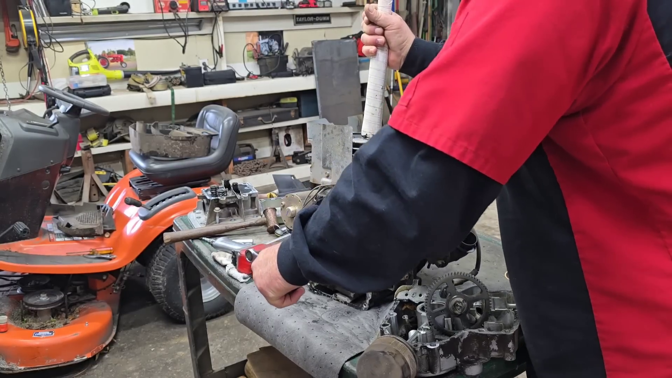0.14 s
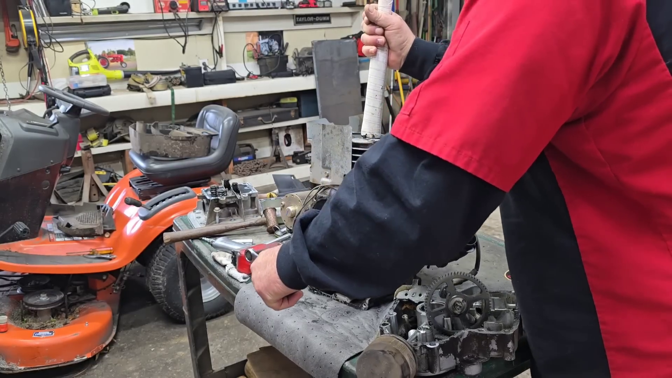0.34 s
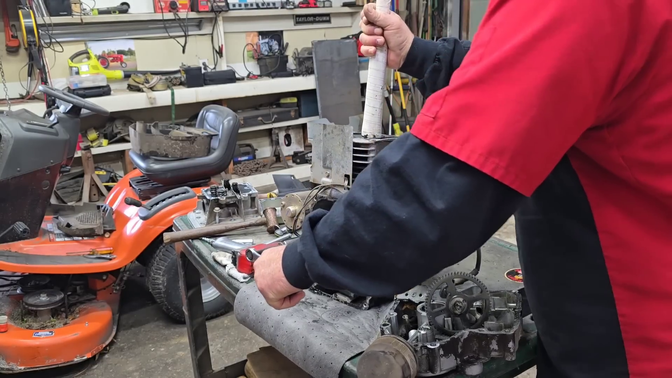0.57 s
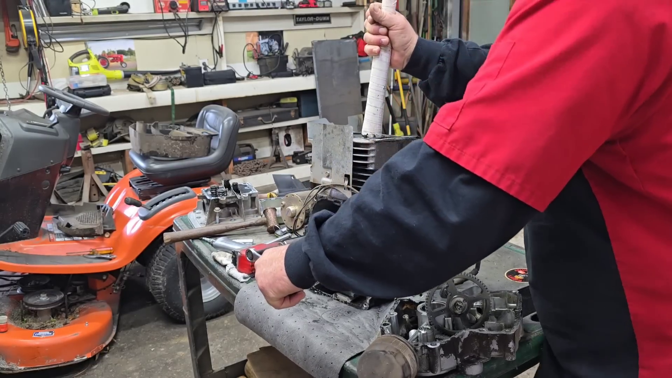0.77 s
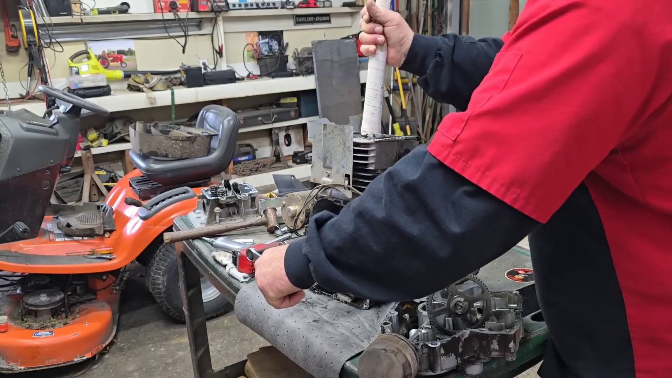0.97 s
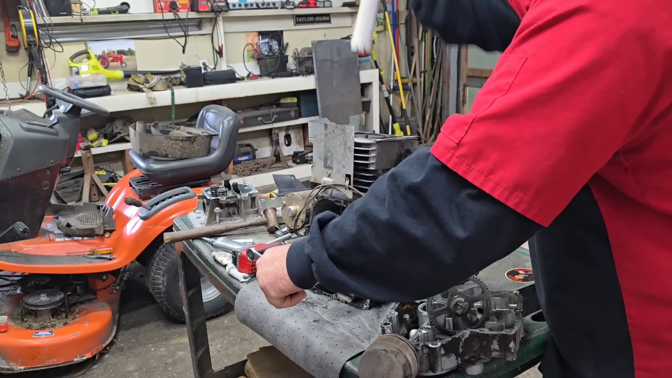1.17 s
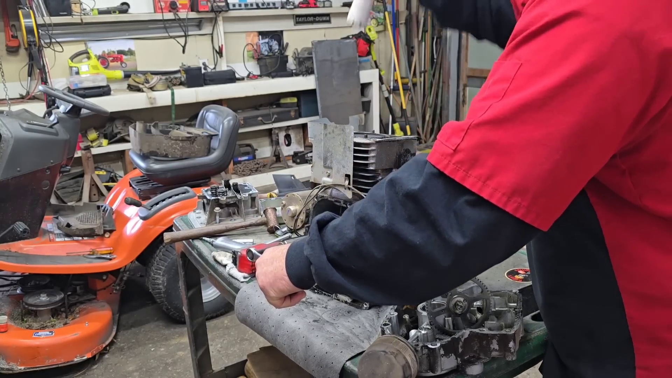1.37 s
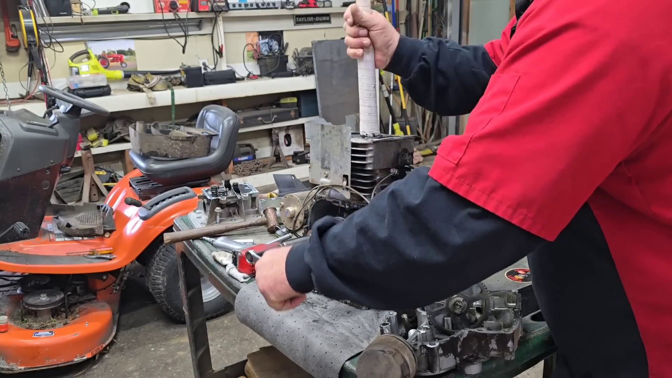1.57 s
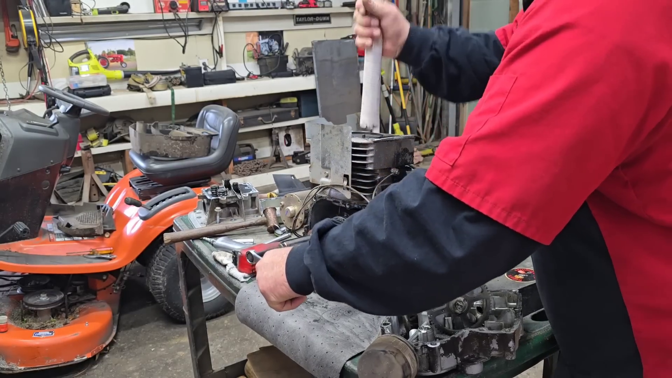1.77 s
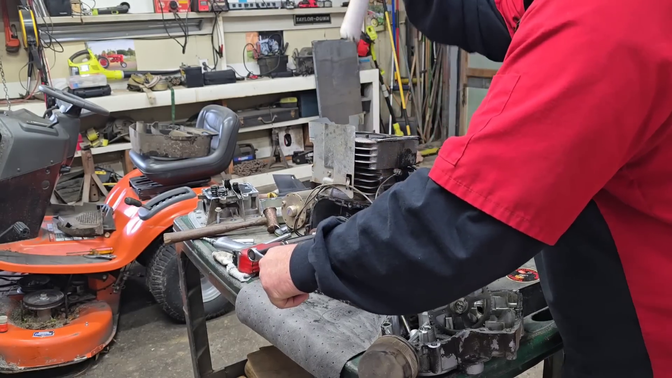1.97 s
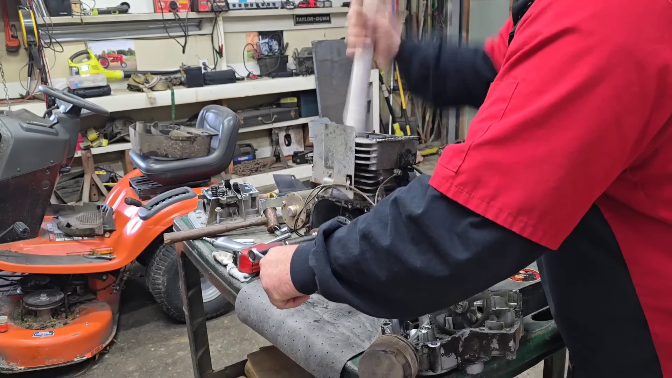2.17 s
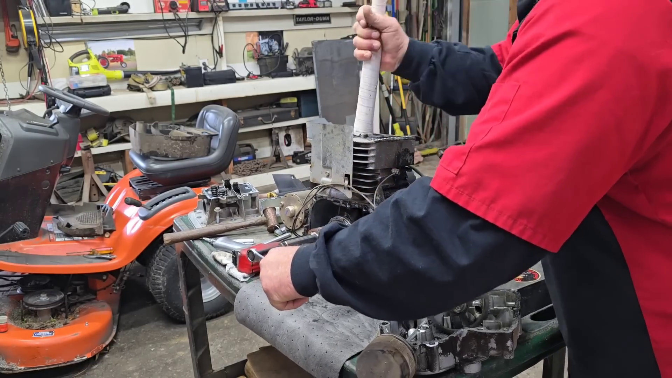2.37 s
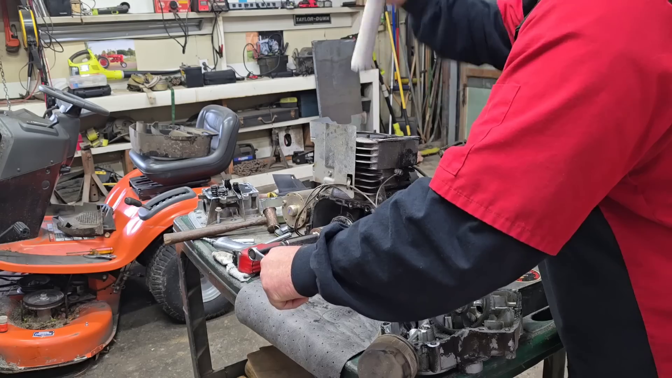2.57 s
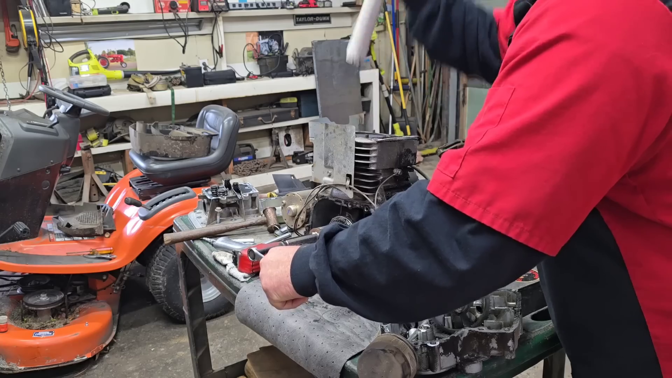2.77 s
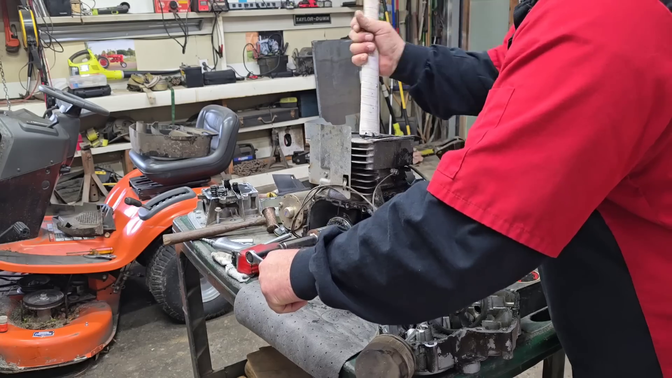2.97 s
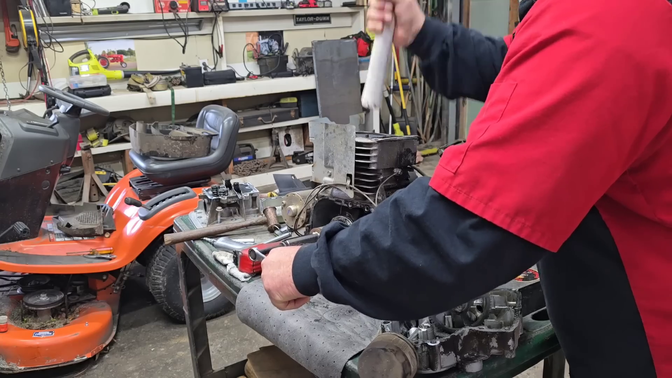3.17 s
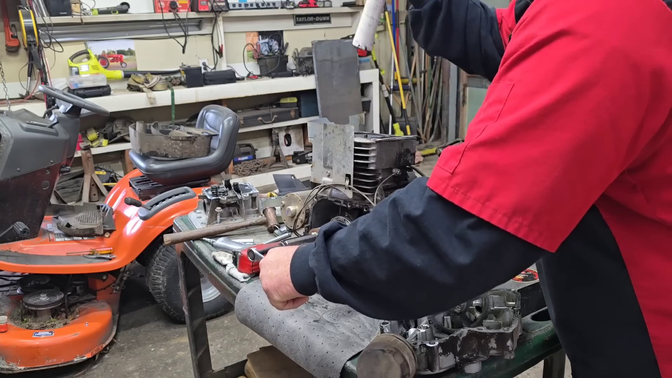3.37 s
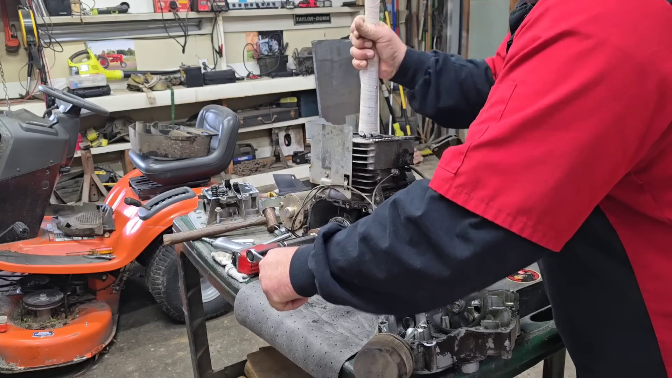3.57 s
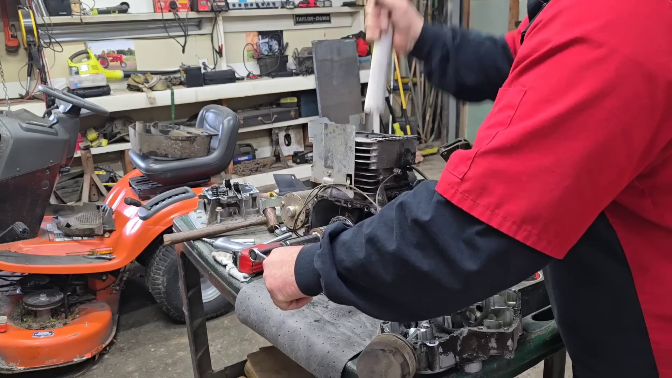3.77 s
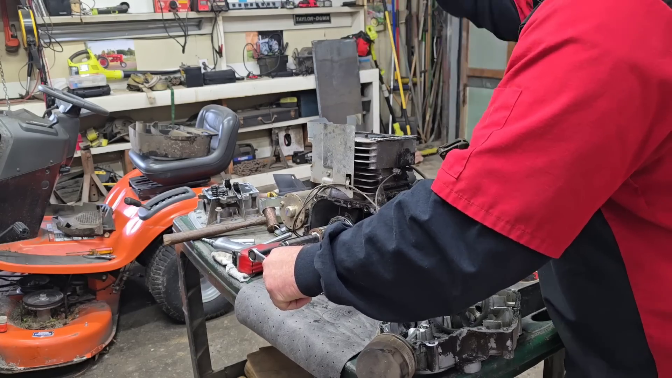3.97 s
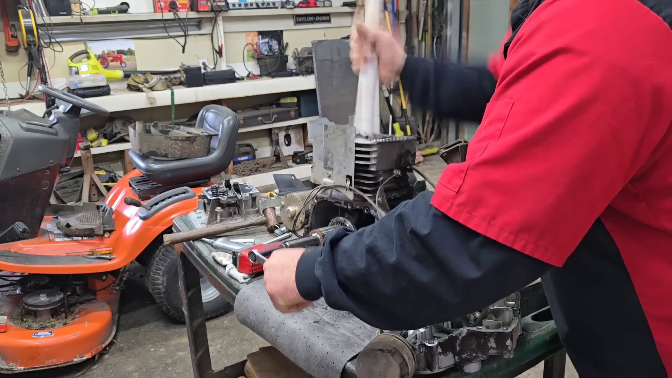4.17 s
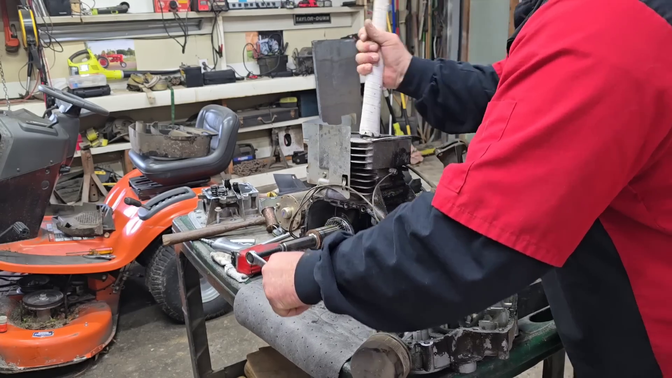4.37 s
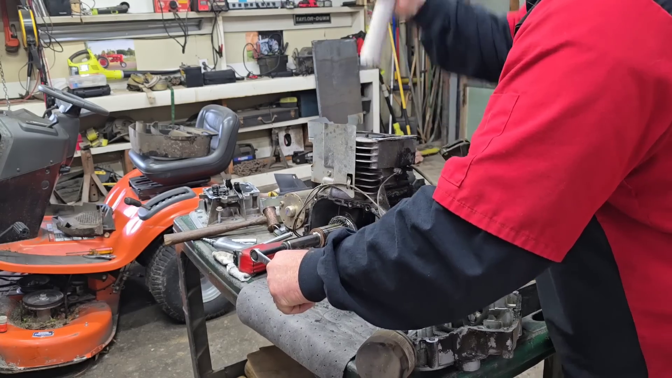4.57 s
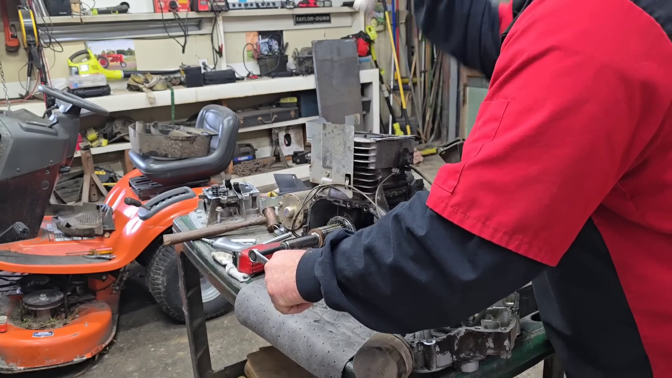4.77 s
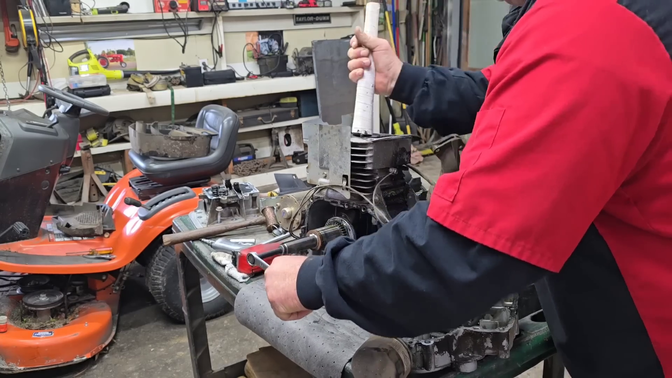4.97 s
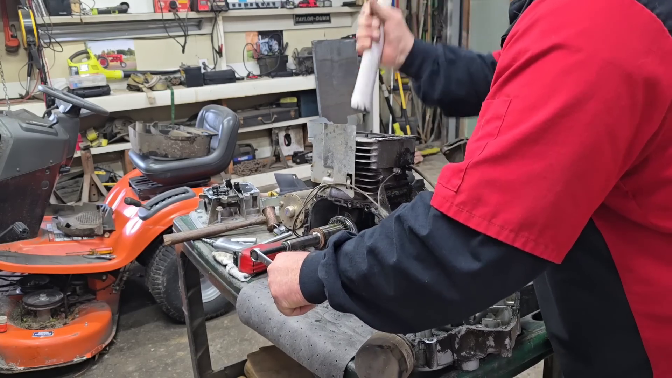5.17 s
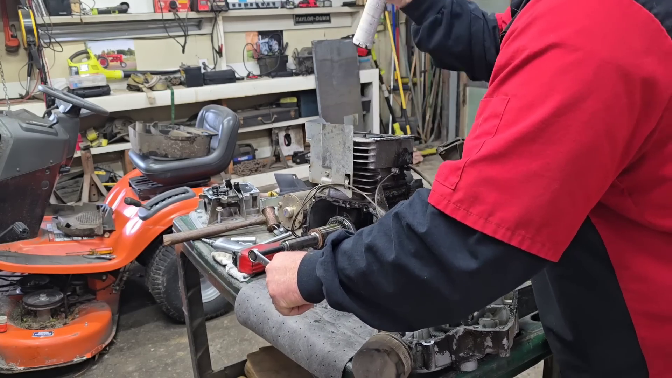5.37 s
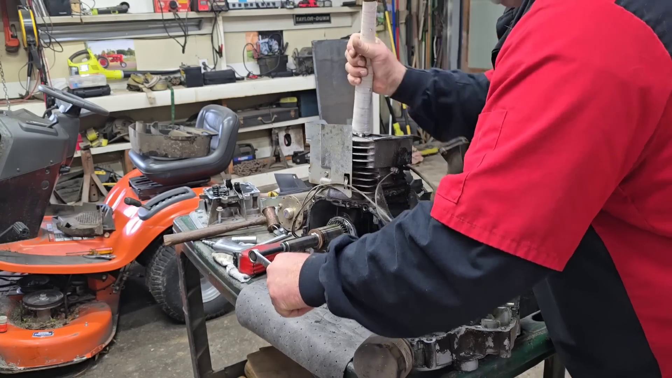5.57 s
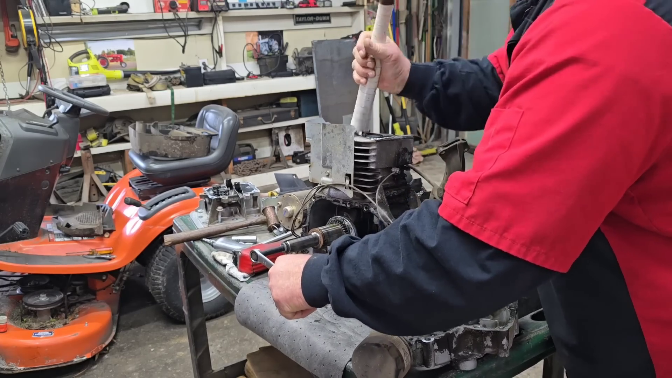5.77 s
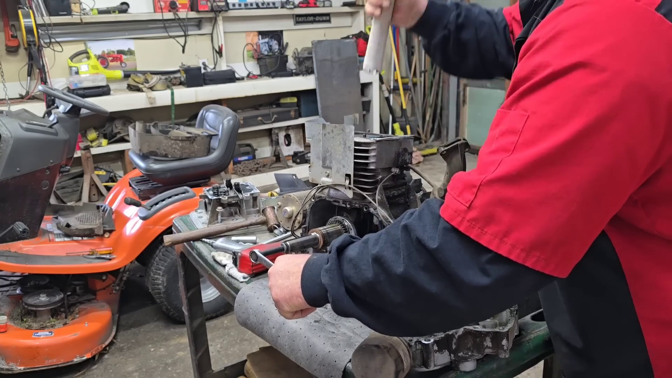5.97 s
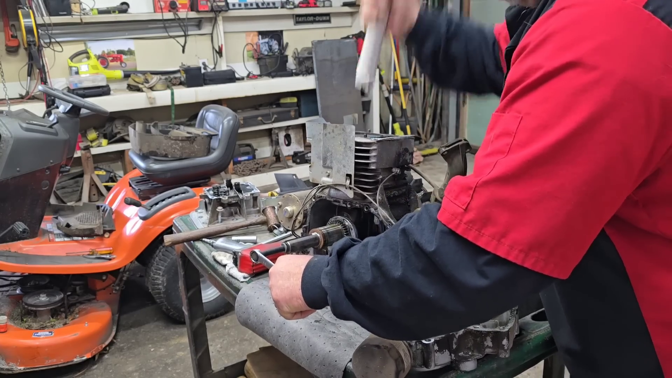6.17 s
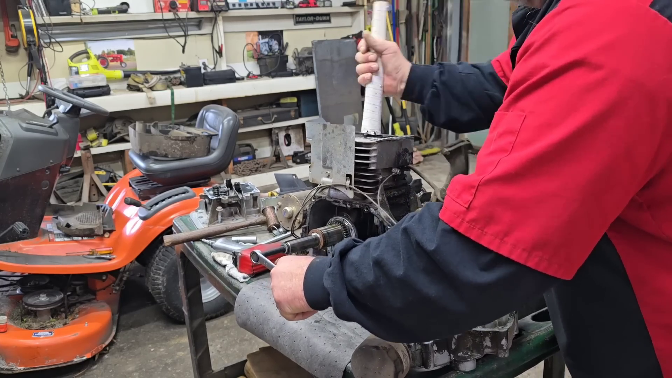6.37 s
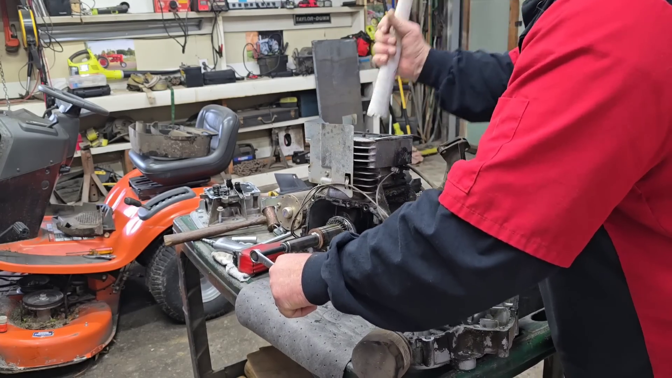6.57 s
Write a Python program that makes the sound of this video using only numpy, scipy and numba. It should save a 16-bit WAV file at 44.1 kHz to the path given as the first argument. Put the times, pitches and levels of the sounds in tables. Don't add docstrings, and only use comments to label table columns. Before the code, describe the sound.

Quiet cloth rustle and a faint tool scrape open in a workshop. From about one and a half seconds, eight sharp wood-on-metal blows land at even spacing, each a loud crack with woody ring, metallic fin ring and low bench boom. Soft thuds and loose spanner clinks fall between them. Close phone microphone, limited peaks, tails cut short by noise suppression.

```python
import sys
import numpy as np
from scipy import signal
from scipy.fft import rfft, irfft
from scipy.io import wavfile
from scipy.ndimage import uniform_filter1d, minimum_filter1d
from numba import njit

SR = 44100
rng = np.random.default_rng(int(sys.argv[2]) if len(sys.argv) > 2 else 0)


def generate_wav(sig):
    pcm = np.round(np.clip(np.atleast_2d(sig).T, -1, 1) * 32767).astype(np.int16)
    wavfile.write(sys.argv[1], SR, pcm)


def attenuation_scalar(level_db):
    decades = np.asarray(level_db, float) / 20
    return 10 ** decades


N = 292383

# t/s, strength/dB, handle level/dB, fins level/dB, brightness/(dB per octave)
BLOWS = [
    (1.525, 6, 4.5, -6.5, -1.5),
    (2.209, 8, -4, -1.5, -0.5),
    (2.866, 7.5, -5, -4, 1),
    (3.515, 6.5, 0, -1, -0.5),
    (4.1921, 13, -1.5, 1, 1),
    (4.8879, 11.5, -12.5, 4.5, -2.5),
    (5.5588, 3, 0.5, -23, 0),
    (6.239, 7.5, -7, 9, 4),
]
BLOW_SIZE = 2 * SR // 3


def on_log(table, hz):
    table = np.array(table)
    return np.interp(np.log(hz + 1), np.log(table[:, 0]), table[:, 1])


def colour(x, table):
    log_gain = on_log(table, np.fft.rfftfreq(4096, 1 / SR)) * np.log(10) / 20
    ceps = irfft(log_gain)
    ceps[1:2048] *= 2
    ceps[2049:] = 0
    return signal.fftconvolve(x, irfft(np.exp(rfft(ceps))))[:len(x)]


def fall(t60, size):
    return np.exp(-np.log(1000) * np.arange(size) / SR / t60)


def swish(s, rise_t60, fall_t60):
    t = np.arange(N) / SR - s
    return attenuation_scalar(-120 * np.where(t < 0, -t / max(rise_t60, .02), t / max(fall_t60, .02)))


def ring(modes, scatter_db, size, rough=0.11):
    t = np.arange(size) / SR
    out = np.zeros(size)
    for hz, db, t60 in modes:
        draw = rng.standard_normal(64)
        level = attenuation_scalar(db + scatter_db * draw[0])
        tone = np.sin(2 * np.pi * hz * (1 + .004 * draw[1]) * t)
        waver = 1 + rough * np.interp(t * 70, np.arange(62), draw[2:])
        out += level * tone * fall(t60, size) * waver
    return out


def add(out, s, x):
    i = int(s * SR)
    out[i:i + len(x)] += x[:N - i]


def shop(x, wet_db):
    # f/Hz, t60/s
    shop_t60 = [(60, .33), (250, 0.23), (1000, 0.33), (4000, 0.35), (7000, 0.29), (11000, 0.24),
                (16000, 0.17)]
    size = SR
    hz = np.fft.rfftfreq(size, 1 / SR)
    noise = rfft(rng.standard_normal(size))
    echo = np.zeros(size)
    for centre in 45 * 2 ** np.arange(0, 9, .5):
        band = np.clip(1 - 2 * np.abs(np.log2((hz + 1) / centre)), 0, 1)
        echo += irfft(noise * band, size) * fall(on_log(shop_t60, centre), size)
    echo *= np.minimum(np.arange(size) / SR / 0.0083, 1)
    echo /= np.sqrt(np.sum(echo ** 2))
    return x + attenuation_scalar(wet_db) * signal.fftconvolve(x, echo)[:N]


def air():
    # f/Hz, level/(dB per Hz)
    rumble_tone = [(24, -72.5), (40, -16), (91, -7), (214, -3), (265, -3), (942, -24), (1200, -38),
                   (1560, -72.5), (2640, -120)]
    rustle_tone = [(290, -28), (500, 3), (960, 1), (1050, 1), (1360, -1.5), (2130, -6.5), (2360, -10),
                   (4150, -5.5), (4800, -4), (7640, -15.5), (16000, -58.5)]
    slide_tone = [(700, -27), (1200, -6.5), (1360, 3.5), (1550, -4.5), (2200, -7), (2620, 0), (2900, -11.5),
                  (5000, -18), (8000, -37.5)]
    # t/s, level/dB
    slide_db = [(0, -60), (.2, -63.5), (.24, -58.5), (.42, -54), (.5, -62), (.6, -100)]
    # t of peak/s, rumble level/dB, rustle level/dB, rise t60/s, fall t60/s
    moves = [(0, -67.5, -64, .3, 2.5), (.22, -56.5, -64.5, 0.55, 2.5), (.42, -58, -56, 1.5, 0.76),
             (.7, -56, -63.5, 1.7, 0.57), (0.837, -47.5, -50, 0.043, 0.48), (1.08, -64.5, -74.5, 1.5, 1.5),
             (1.251, -61.5, -65, 2.3, 1.3), (1.5, -51.5, -61.5, 0.35, .7), (1.829, -51, -53, 0.04, 0.11),
             (1.95, -53.5, -74, 1.5, 2.2), (2.149, -57.5, -50.5, 0.76, 0.19),
             (4.65, -61.5, -60.5, 1.2, 1.1), (4.82, -63, -62.5, 1.7, 4.5), (6.052, -67, -73.5, .3, .45),
             (6.2, -68, -68, .5, 0.82)]
    rumble, rustle = attenuation_scalar(2 * -74.5), attenuation_scalar(2 * -81)
    for s, rumble_db, rustle_db, rise_t60, fall_t60 in moves:
        shape = swish(s, rise_t60, fall_t60)
        rumble = rumble + attenuation_scalar(2 * rumble_db) * shape
        rustle = rustle + attenuation_scalar(2 * rustle_db) * shape
    after_s, rise_t60_s, share = 0.25, 0.9, 0.68
    for s, db, *_ in BLOWS:
        rumble = rumble + attenuation_scalar(2 * (-68 + share * db)) * swish(s + after_s, rise_t60_s, 2.5)
        rustle = rustle + attenuation_scalar(2 * (-70 + share * db)) * swish(s + after_s, rise_t60_s, 1.7)
    slide = attenuation_scalar(2 * np.interp(np.arange(N) / SR, *np.transpose(slide_db)))
    layers = [(rumble_tone, rumble, 40, 3.5), (rustle_tone, rustle, 25, 2.5), (slide_tone, slide, 30, 1.5)]
    out = np.zeros(N)
    for tone, power, rate_hz, patchy_db in layers:
        x = colour(rng.standard_normal(N), tone)
        k = int(SR / rate_hz)
        flicker = uniform_filter1d(np.repeat(rng.standard_normal(N // k + 1), k), k)[:N]
        out += x / np.std(x) * np.sqrt(power) * attenuation_scalar(patchy_db * flicker)
    return out


def pings():
    # t/s, level/dB, f/Hz, t60/s
    ping_events = [(1.55, -44, 12680, .3), (2.215, -44, 15700, .35), (2.306, -30, 7620, .25),
                   (2.33, -49, 6610, 1.1), (2.365, -57, 12650, .15), (2.184, -36, 2110, .15),
                   (4.62, -60, 4500, .4), (5.055, -9, 2350, .03), (6.3, -24, 1620, .45),
                   (3.0, -50, 6610, 1.0), (4.27, -52, 14850, .3), (4.92, -46, 12680, .35),
                   (5.06, -56, 10900, .5), (5.8, -53, 6610, .9), (5.566, -17, 5270, .2),
                   (2.225, -11, 5320, .22), (2.87, -14, 3990, .38), (3.53, -14, 4020, .25),
                   (6.245, -12, 4560, .4), (6.26, -46, 15700, .35)]
    out, size = np.zeros(N), SR // 2
    for s, db, hz, t60 in ping_events:
        modes = [(hz, db, t60), (hz * 1.012, db - 4, t60), (hz * .99, db - 6, t60)]
        add(out, s, ring(modes, 2, size, rough=.9) * (1 - fall(.1 * t60, size)))
    return out


def thuds():
    # t/s, peak level/dB, pitch f/Hz, scuff brightness/dB
    thud_events = [(0.197, -54, 220, -25), (0.229, -28.5, 530, 1), (0.258, -35, 214, -33),
                   (0.36, -33.5, 162, -34), (0.39, -34.5, 160, -29), (0.569, -17, 158.7, -19),
                   (0.828, -35, 473, -25), (0.903, -38.5, 214, -23), (1.858, -19.5, 152, -30.5),
                   (1.889, -36.5, 298, -19), (1.919, -36, 144, -29), (1.954, -25.5, 164, -21),
                   (2.499, -21, 163.2, -20.5), (2.552, -30, 126.5, -21), (2.601, -25.5, 146.5, -12),
                   (2.661, -38.5, 224, -24), (2.706, -40.5, 152.6, -26), (2.756, -53, 325.5, -24.5),
                   (3.125, -28.5, 163.4, -22.5), (4.417, -8.5, 174, -10.5), (4.462, -14.5, 152, -17.5),
                   (4.523, -22.5, 164, -21.5), (4.654, -37.5, 135, -17), (4.719, -21.5, 258, -37),
                   (5.162, -20, 158.4, -2), (5.301, -34.5, 131.4, -17), (5.807, -29.5, 161, -31.5),
                   (6.008, -44.5, 238, -11)]
    out, size = np.zeros(N), SR // 3
    for s, db, hz, bright_db in thud_events:
        t60 = 0.11 * (160 / hz) ** 0.25
        x = np.zeros(size)
        for share, mode_db in (1, 0), (.7, -4), (1.4, -5), (2.1, -11):
            x += ring([(share * hz, mode_db, t60)], 2, size)
        scuff = [(40, -24.5), (90, -3.5), (200, 10.0), (600, -3),
                 (1500, bright_db), (5000, bright_db - 13), (9000, -62)]
        x += attenuation_scalar(5) * colour(rng.standard_normal(size) * fall(t60, size), scuff)
        add(out, s, attenuation_scalar(db - 1) * x * (1 - fall(0.021, size)))
    return out


def clinks():
    # t/s, peak level/dB, ring level/dB, brightest f/Hz
    clink_events = [(.229, -38, -25, 2400), (2.0189, -16.5, -7, 3550), (2.0686, -22, -12.5, 4470),
                    (2.1012, -12.5, -4.5, 2995), (2.187, -31.5, -21, 2133), (2.594, -38.5, -8, 4450),
                    (2.763, -38, -25, 800), (3.936, -34.5, -25.5, 702), (4.6201, -41, -14, 5075),
                    (4.781, -34, -16, 1800), (4.975, -13, -21.5, 8920), (5.0567, 6, -22, 2336),
                    (5.08, -10, -20, 2465), (6.013, -28.5, -36, 1095)]
    # f/Hz, level/dB, t60/s
    spanner = [(960, -16, .05), (1280, -16, .05), (2080, -10, .14), (3070, -12, .07), (4610, -13, .09),
               (5080, -11, .07), (6010, -15, .07), (7930, -19, .04), (12630, -29, .12)]
    out, size = np.zeros(N), SR // 3
    for s, db, ring_db, hz in clink_events:
        tone = [(hz / 6, -30), (hz / 4.0, -7), (hz, 0), (hz * 1.2, -3),
                (hz * 2.5, -10), (hz * 4, -28), (40000, -60)]
        chatter = fall(0.0093, size) + attenuation_scalar(-5) * fall(.14, size)
        tick = colour(rng.standard_normal(size) * chatter, tone)
        tick = colour(tick, [(7000, 0), (10000, -7.5), (14000, -21)])
        add(out, s, attenuation_scalar(db) * (tick + attenuation_scalar(ring_db) * ring(spanner, 1.2, size, rough=1.0)))
    return out


def squash():
    return 1 - fall(0.021, BLOW_SIZE)


def crack(tilt):
    # f/Hz, level/(dB per Hz)
    crack_tone = [(40, -29), (120, -4), (230, 0.5), (500, -5.5), (700, 1), (1000, -8), (1650, -8),
                  (2000, -14.5), (2400, -13), (3200, -17.5), (5400, -12), (8000, -25), (11000, -34.5),
                  (16300, -49.5)]
    noise = rng.standard_normal(BLOW_SIZE)
    rebound = np.roll(fall(0.013, BLOW_SIZE), int(.017 * SR))
    spiky = noise ** 3 / np.sqrt(15)
    rattle = colour(spiky * fall(0.17, BLOW_SIZE), [(5000, -4), (12000, -14)])
    hit = noise * (fall(0.031, BLOW_SIZE) + attenuation_scalar(-5.5) * rebound)
    burst = squash() * (hit + attenuation_scalar(-14.0) * rattle)
    brightness = [(150, -2.5), (600, -1.0), (1000, -2.5), (16000, 4 * tilt)]
    return attenuation_scalar(17.5) * colour(colour(burst, crack_tone), brightness)


def bench_boom(tilt):
    # f/Hz, level/dB, t60/s
    bench = [(85, -6, .25), (132.33, 1.6, 0.36), (173, -2, 0.51), (223.8, 6.5, 0.25), (286, -3.5, 0.34),
             (316.3, -9, 0.41), (381, -12, 0.45), (435, -17.5, 0.53), (529, -14, 0.08)]
    boom_tone = [(60, -10.5), (130, -3.0), (300, 5.5), (550, -5), (1200, -41.0), (9000, -81)]
    boom = colour(rng.standard_normal(BLOW_SIZE), boom_tone) * fall(0.28, BLOW_SIZE)
    swell = (1 - fall(0.12, BLOW_SIZE)) ** 2
    modes = ring(bench, 1.5, BLOW_SIZE, rough=.1)
    return attenuation_scalar(-1.87 - 0.87 * tilt) * swell * (attenuation_scalar(-7.5) * modes + attenuation_scalar(17.5) * boom)


def handle_and_fins(handle_db, fins_db):
    # f/Hz, level/dB, t60/s
    handle = [(694.3, 2.5, 0.23), (734, 5.5, 0.052), (727, -14.5, 0.47), (800, -15, 0.14),
              (1558, -13, 0.27), (1550, -10, 0.017), (1660, -17.5, 0.39)]
    fins = [(2400, -0.5, 0.2), (3222, -10, 0.13), (4270, -5.5, 0.19), (3960, -8, 0.27), (4548, -4.5, .22),
            (5290, -3.5, 0.24), (4940, -10, .21), (5342, -8, 0.26), (5477, -7.5, 0.21), (5540, -11, 0.2),
            (7400, -24.5, 0.15), (12630, -24, .18), (15650, -35, .15)]
    snap_tone = [(500, -15.0), (2500, 6), (6000, 1.5), (9000, -11), (15000, -24)]
    snap = colour(rng.standard_normal(BLOW_SIZE), snap_tone) * fall(0.036, BLOW_SIZE)
    x = attenuation_scalar(handle_db - 7) * ring(handle, 1.5, BLOW_SIZE, rough=.4)
    x += attenuation_scalar(fins_db - 18) * ring(fins, 1.5, BLOW_SIZE, rough=.9)
    return squash() * (x + attenuation_scalar(4.5) * snap)


def blows():
    cracks, rings = np.zeros(N), np.zeros(N)
    for s, db, handle_db, fins_db, tilt in BLOWS:
        add(cracks, s, attenuation_scalar(db) * crack(tilt))
        add(rings, s, attenuation_scalar(db) * (bench_boom(tilt) + handle_and_fins(handle_db, fins_db)))
    return shop(cracks, 6.4) + shop(rings, -8.5)


def scene():
    return (blows() + shop(clinks() + thuds() + pings(), -11))[None]


@njit
def follower(x, attack, release):
    e, y = 0., np.empty(len(x))
    for i in range(len(x)):
        e += (x[i] - e) * (attack if x[i] > e else release)
        y[i] = e
    return y


def limit(x):
    limit_db, look_s, release_s = -.2, .0015, 0.0064
    look = int(look_s * SR)
    peak = -minimum_filter1d(-np.abs(x), size=2 * look + 1)
    cut_db = np.maximum(20 * np.log10(peak + 1e-9) - limit_db, 0)
    return x * attenuation_scalar(-uniform_filter1d(follower(cut_db, 1., 1 / (release_s * SR)), size=look))


def suppress(x, steep, least_db, ease_db):
    # f/Hz, level/dB
    gate = [(100, -68), (500, -61.5), (1500, -61), (5000, -68), (8000, -81.5), (11000, -95.5),
            (16000, -102)]
    hz, _, z = signal.stft(x, SR, nperseg=512)
    raw_power = np.abs(z) ** 2
    power = np.abs(uniform_filter1d(uniform_filter1d(raw_power, size=9, axis=0), size=2, axis=1))
    total = np.sum(raw_power, axis=0)
    bang = (total > .02) & (total > 100 * np.roll(total, 3))
    held = np.convolve(bang, np.ones(45))[:len(total)] > 0
    eased = uniform_filter1d(1. * held, size=3)
    threshold_db = on_log(gate, hz)[:, None] - ease_db * eased * (hz < 8000)[:, None]
    gain = (power / (power + attenuation_scalar(2 * threshold_db))) ** steep
    floor = attenuation_scalar(on_log([(5000, least_db), (10000, least_db - 25)], hz))[:, None]
    return signal.istft(z * np.maximum(gain, floor), SR, nperseg=512)[1][:N]


def top_cut(x):
    return signal.sosfilt(signal.butter(12, 16460, fs=SR, output="sos"), x)


def record(dry):
    # f/Hz, level/dB
    capsule = [(7000, -1.5), (11000, -1), (16000, -3.5)]
    overload = attenuation_scalar(11)
    x = dry[0] / (1 + np.abs(dry[0] / overload) ** 4) ** .25
    x = colour(x, capsule)
    x = signal.sosfilt(signal.butter(5, 66, "high", fs=SR, output="sos"), x)
    x = signal.sosfilt(signal.ellip(10, .2, 90, 15900, fs=SR, output="sos"), x)
    x = suppress(limit(x), steep=2.4, least_db=-9.5, ease_db=12)
    mix = (x + air())[None]
    return top_cut(mix)


dry = scene()
out = record(dry)
generate_wav(out)
```